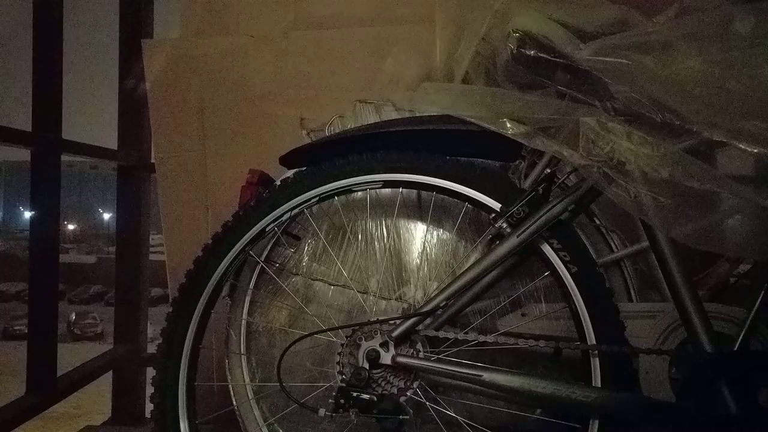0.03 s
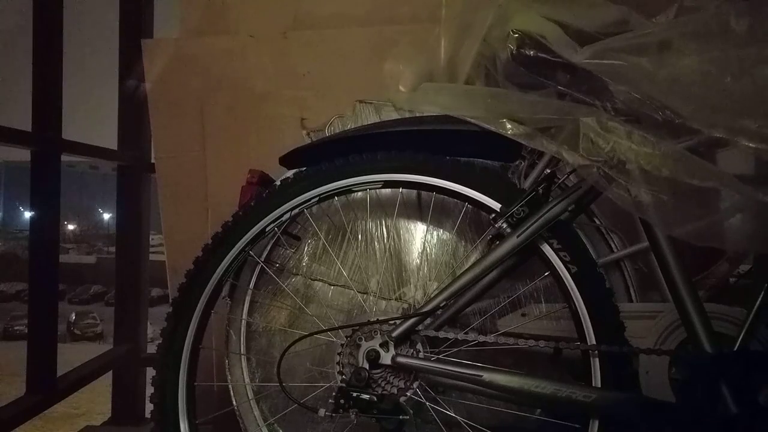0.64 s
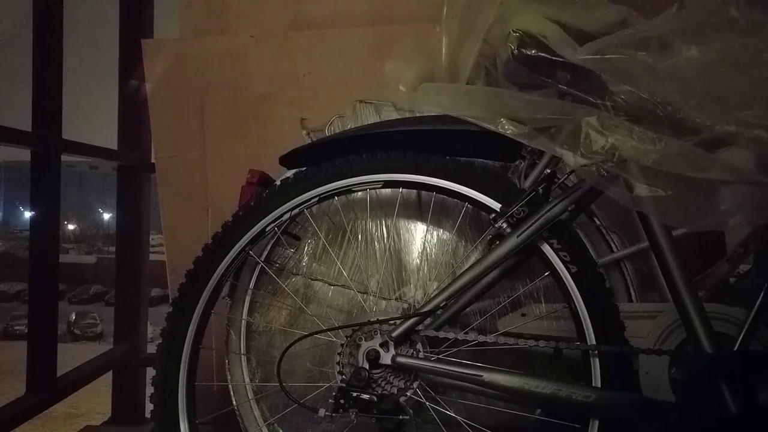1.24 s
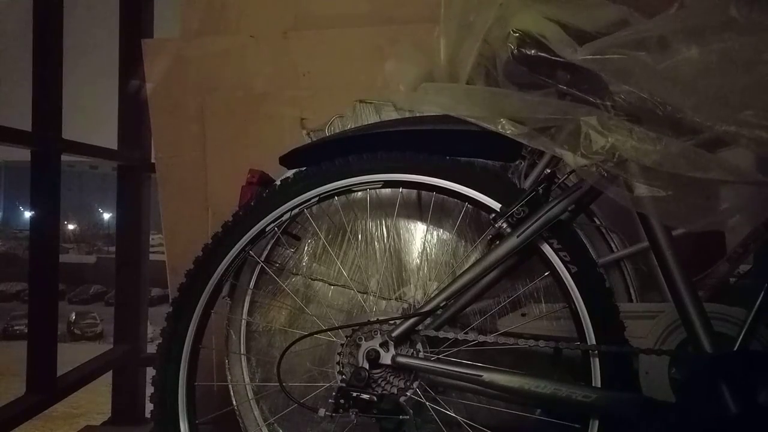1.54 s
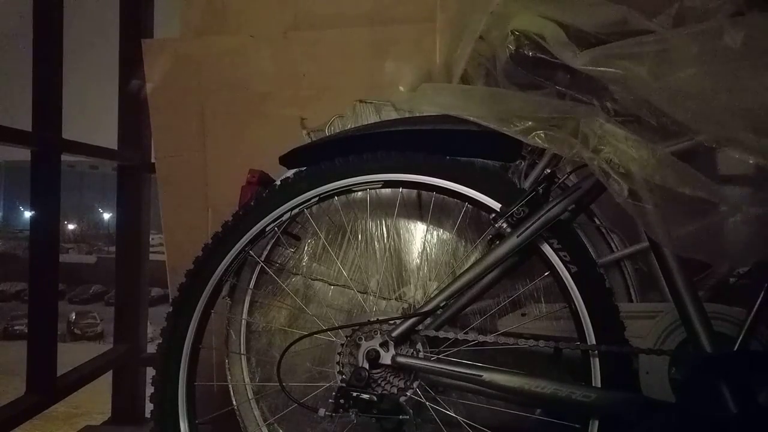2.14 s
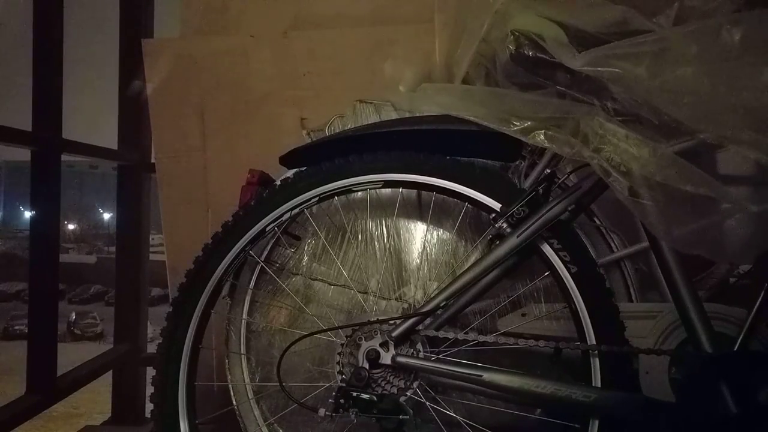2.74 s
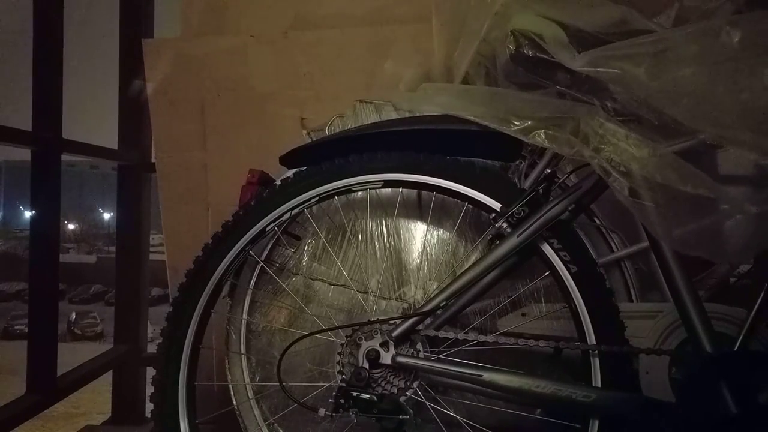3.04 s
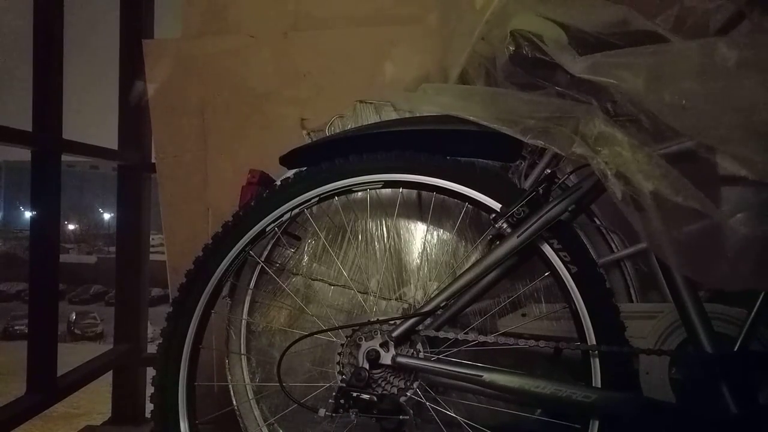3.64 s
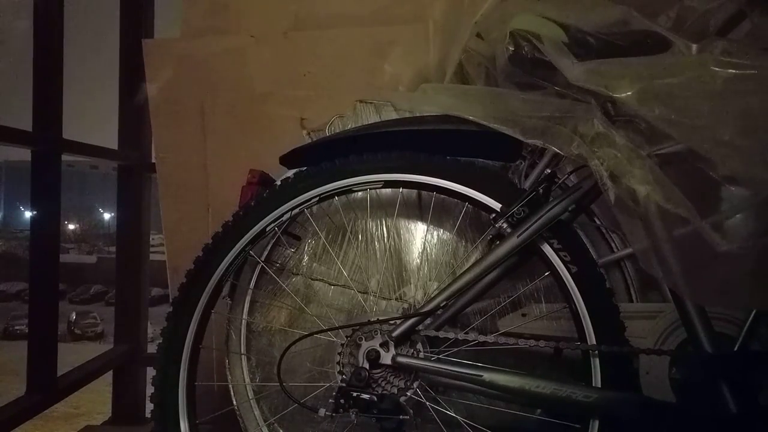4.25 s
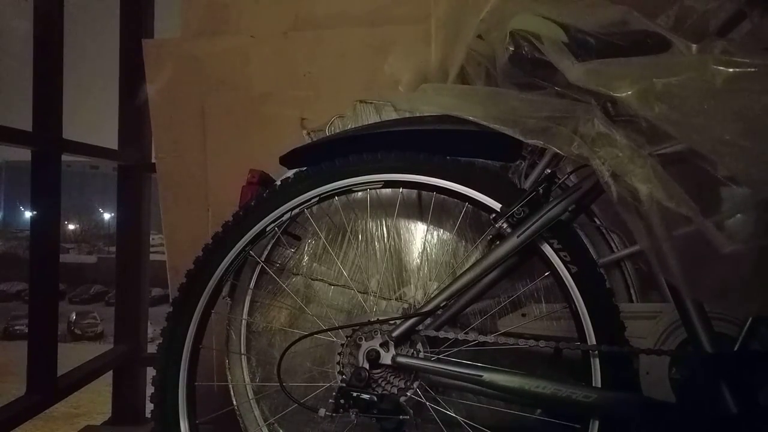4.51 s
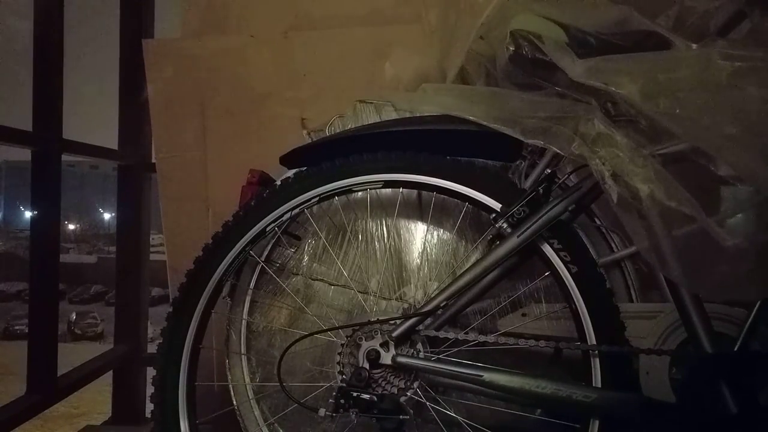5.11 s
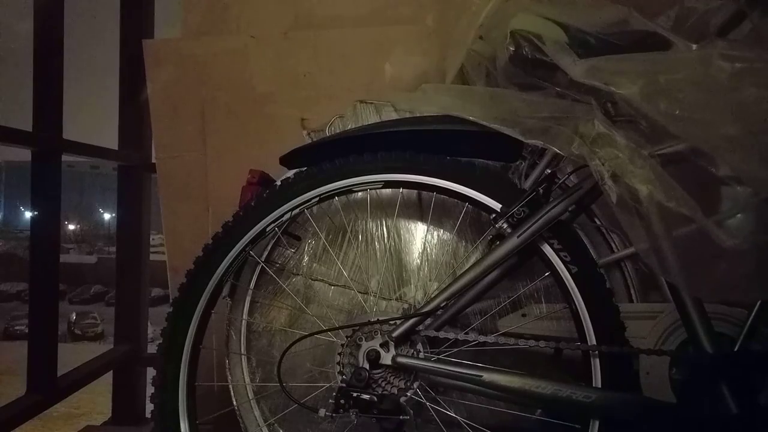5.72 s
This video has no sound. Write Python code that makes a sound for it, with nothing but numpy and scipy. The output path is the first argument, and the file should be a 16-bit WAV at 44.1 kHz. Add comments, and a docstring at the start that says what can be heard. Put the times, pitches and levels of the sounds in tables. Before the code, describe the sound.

Far traffic rumbles quietly while a plastic sheet stirs and ticks in the wind, interrupted by a single loud microphone pop.

```python
"""A high balcony at night: a distant town hums while a light wind stirs the plastic sheet over a bicycle.
Far traffic merges into a noise with engine drones, under the microphone's faint hiss. The sheet rustles
as its film buckles, thuds softly as it pulls taut and ticks as creases snap through. One sharp pop,
perhaps a static discharge, jolts the microphone, and the limiter ducks everything for a moment."""
import sys
import numpy as np
from scipy import signal
from scipy.fft import rfft, irfft
from scipy.io import wavfile
from scipy.ndimage import uniform_filter1d

SR = 44100
rng = np.random.default_rng(int(sys.argv[2]) if len(sys.argv) > 2 else 0)


def wav_record(signal):
    """Record a signal, one row per channel, as 16-bit PCM in the file named by sys.argv[1]."""
    frames = np.transpose(np.atleast_2d(signal))
    bounded = np.clip(frames, -1, 1)
    # unit amplitude maps onto the largest positive 16-bit level
    quanta = np.round(bounded * 32767).astype(np.int16)
    wavfile.write(sys.argv[1], SR, quanta)


N = 263277
T = np.arange(N) / SR


def undb(db):
    """Decibels to amplitude ratio."""
    return 10 ** (np.asarray(db) / 20)


def level(x, db):
    """Scale to an rms level."""
    return x * undb(db) / np.sqrt(np.mean(x ** 2))


def colour(x, spectrum):
    """Spectral shaping by (frequency [Hz], level [dB]) points, the highest taken as unity gain."""
    hz, db = np.transpose(spectrum)
    bin_hz = np.maximum(np.arange(N // 2 + 1) * SR / N, 1)
    gain_db = np.interp(np.log(bin_hz), np.log(hz), db - db.max(), left=-60)
    return irfft(rfft(x) * undb(gain_db), N)


def band(x, hz, kind, order=2):
    """Butterworth filter: maximally flat in its passband."""
    return signal.sosfilt(signal.butter(order, hz, kind, fs=SR, output="sos"), x)


def resonate(x, modes):
    """Resonance: each mode (frequency [Hz], bandwidth [Hz], boost [dB]) lifts a narrow band."""
    return x + sum((undb(db) - 1) * signal.lfilter(*signal.iirpeak(hz, hz / width, fs=SR), x)
                   for hz, width, db in modes)


def decay(t, t60):
    """Exponential damping: 60 dB down after t60 seconds."""
    return np.exp(-np.log(1000) * t / t60)


def waver(rate_hz):
    """Slow random modulation of unit rms: held values, smoothed twice."""
    size = int(SR / rate_hz)
    held = np.repeat(rng.standard_normal(N // size + 1), size)[:N]
    return level(uniform_filter1d(uniform_filter1d(held, size), size), 0)


def add(out, start_s, sound):
    """Superpose a sound from a given time."""
    start = int(start_s * SR)
    out[start:start + len(sound)] += sound[:N - start]


def swell(width_s=0.15, lull_db=-1.5):
    """Amplitude modulation of the town's bass: Gaussian rises in level above a lull."""
    # swells of the rumble (crest time [s], lift [dB])
    crests = [(0.58, 2), (1.17, 5), (2.6, 3), (3.5, 2.5), (5.1, 2.5)]
    return undb(lull_db + sum(db * np.exp(-((T - s) / width_s) ** 2 / 2) for s, db in crests))


def town(split_hz=260, waver_db=0.66):
    """Incoherent summation: far traffic merges into noise. Its bass swells; the rest wavers slightly."""
    # spectrum of far traffic (frequency [Hz], relative spectral level [dB])
    traffic_spectrum = [(15, -26), (30, -26), (45, -11.5), (65, -8), (125, -10.5), (170, -10), (220, -14.5),
                        (330, -18), (450, -23.5), (750, -22), (1400, -22), (2000, -28), (3200, -33),
                        (6000, -42)]
    # resonances of the balcony (frequency [Hz], bandwidth [Hz], boost [dB])
    balcony_modes = [(47, 10.5, 7), (91.6, 22, 5.5), (183, 24, 5), (301, 5.8, 1.5), (545, 40, 4),
                     (676, 67, 3), (1127, 50, 3.5), (1233, 52, 3.5), (1575, 44, 3.5), (2210, 130, 2.5),
                     (2664, 81, 4.5)]
    # drones of far engines (frequency [Hz], bandwidth [Hz], level before the swell [dB])
    engine_bands = [(64.1, 7, -59.5), (155.9, 8.8, -63.5)]
    traffic = colour(rng.standard_normal(N), traffic_spectrum)
    wash = level(resonate(traffic, balcony_modes), db=-57.5)
    rumble = signal.sosfiltfilt(signal.butter(2, split_hz, fs=SR, output="sos"), wash)
    drones = np.zeros(N)
    for hz, width, db in engine_bands:
        drone = band(rng.standard_normal(N), [hz - width / 2, hz + width / 2], "bandpass")
        drones += level(drone, db)
    return (rumble + drones) * swell() + (wash - rumble) * undb(waver_db * waver(rate_hz=8.1))


def hiss():
    """Self-noise of the microphone, peaking at the acoustic resonance of its port."""
    # noise floor (frequency [Hz], relative spectral level [dB])
    noise_spectrum = [(3000, -25), (5500, -12.5), (7000, -9.5), (7800, -3), (8500, 1), (9100, -14.5),
                      (10200, -13), (16000, -11)]
    return level(colour(rng.standard_normal(N), noise_spectrum), db=-66.5)


def sliding(stir_db=-71, rise_to_fall=0.91):
    """Envelope of the rustle: slides grow and die exponentially, adding in power to a constant stir."""
    # slides of the sheet in puffs of wind (crest time [s], level [dB], decay time to 1/e [s])
    slides = [(2.28, -69, 0.05), (2.94, -52, 0.066), (3.23, -59, 0.048), (3.49, -60, 0.064),
              (3.8, -65, 0.12), (4.57, -66, 0.1), (5.4, -66, 0.07)]
    power = undb(stir_db) ** 2
    for crest_s, db, fall_s in slides:
        from_crest = np.maximum((crest_s - T) / (rise_to_fall * fall_s), (T - crest_s) / fall_s)
        power = power + (undb(db) * np.exp(-from_crest)) ** 2
    return np.sqrt(power)


def rustle(buckles_per_s=5000, scatter_db=4.5):
    """Shot noise: countless tiny buckles of the film each radiate an impulse, louder as it slides."""
    # crinkling film at the microphone (frequency [Hz], relative spectral level [dB])
    film_spectrum = [(600, -6.5), (1300, -10.5), (2200, -19), (3700, -25), (5100, -16), (6400, -23),
                     (7600, -10.5), (8400, 1.5), (8900, -1), (9600, -8), (10700, -19), (12900, -14.5),
                     (16000, -19.5)]
    buckles = rng.random(N) < buckles_per_s / SR
    polarity = rng.choice([-1, 1], N)
    strength = undb(scatter_db * rng.standard_normal(N))
    return level(colour(buckles * polarity * strength, film_spectrum), 0) * sliding()


def flaps(detune=0.047, contact_hz=1000):
    """Membrane vibration: the sheet pulls taut and thuds in damped modes whose pitch follows tension."""
    # soft flaps of the sheet (time [s], peak level [dB])
    pulls = [(0.594, -48), (1.009, -45), (1.822, -44), (2.329, -44.5), (2.805, -48), (2.897, -47),
             (2.936, -38), (4.530, -44.5), (4.5783, -31), (5.287, -46.5)]
    # modes of the sheet (nominal frequency [Hz], relative level before the low-pass [dB], T60 [s])
    sheet_modes = [(127, 1, 0.082), (188, -0.5, 0.14), (249, 4.5, 0.032), (400, -20, 0.018),
                   (1150, -2, 0.0073), (4200, 14, 0.014)]
    out, t = np.zeros(N), T[:SR // 4]
    for start_s, peak_db in pulls:
        pitch_ratio = 1 + detune * rng.standard_normal()
        ring = sum(undb(db) * np.cos(2 * np.pi * hz * pitch_ratio * t) * decay(t, t60)
                   for hz, db, t60 in sheet_modes)
        thud = band(ring, contact_hz, "lowpass")  # the soft contact rounds the attack
        add(out, start_s, undb(peak_db) * thud / np.abs(thud).max())
    return out


def ticks(t60=0.022, ring_width_hz=600, ring_db=17.5):
    """Snap-through buckling: a crease gives a short crackle that rings at the crease's own pitch."""
    # snapping creases (time [s], rms level of the first 5 ms [dB], ring frequency [Hz])
    creases = [(2.0916, -57.5, 8850), (2.262, -58, 8900), (2.2774, -59, 8300), (2.3005, -60, 8900),
               (2.532, -58.5, 8340), (2.9365, -55, 8500), (3.295, -58.5, 8600), (3.4225, -58, 8900),
               (4.5770, -57, 9300)]
    out, t = np.zeros(N), T[:SR // 20]
    for start_s, db, hz in creases:
        crackle = band(rng.standard_normal(len(t)), [4500, 11000], "bandpass", order=1)
        snap = resonate(crackle * decay(t, t60), [(hz, ring_width_hz, ring_db)])
        add(out, start_s, undb(db) * snap / np.std(snap[:len(t) // 10]))
    return out


def pop(start_s=3.56256, drive_db=8.5, edge_hz=13000):
    """Step response: the microphone's bass roll-off turns a jump of charge into a dying swing."""
    # second-order high-pass stages of the microphone (corner frequency [Hz], Q [-])
    roll_off = [(53, 1.77), (77, 0.6)]
    out, t = np.zeros(N), T[:SR // 4]
    charge = np.interp(t, [0, .00082, .0018], [.42, 1, .86])  # jumps, peaks, sags and holds
    swing = undb(drive_db) * band(charge, edge_hz, "lowpass", order=1)
    for hz, q in roll_off:
        omega = 2 * np.pi * hz
        high_pass = signal.bilinear([1, 0, 0], [1, omega / q, omega ** 2], SR)
        swing = signal.lfilter(*high_pass, swing)
    add(out, start_s, swing)
    return out


def scene():
    """Linear superposition of all sources at one microphone."""
    return (town() + hiss() + rustle() + ticks() + flaps() + pop())[None]


def record(dry, ceiling_db=-2.9, release_db_per_s=147, soften_hz=15000, top_hz=15800):
    """Peak limiting with instant attack and steady release, after a fade-in and before a treble cut."""
    # fade-in of the whole sound, whose last gain holds (time [s], gain [dB])
    fade_in = [(0.0, -60), (0.11, -51), (0.12, -20.5), (0.24, -8), (0.35, 2.5)]
    faded = dry * undb(np.interp(T, *np.transpose(fade_in)))
    over_db = 20 * np.log10(np.maximum(np.abs(faded) / undb(ceiling_db), 1))
    released_db = release_db_per_s * T
    duck_db = np.maximum.accumulate(over_db + released_db, axis=-1) - released_db
    softened = band(faded * undb(-duck_db), soften_hz, "lowpass", order=1)
    treble_cut = signal.firwin(255, top_hz, fs=SR)
    return signal.fftconvolve(softened, treble_cut[None], mode="same")


dry = scene()
out = record(dry)
wav_record(out)
```